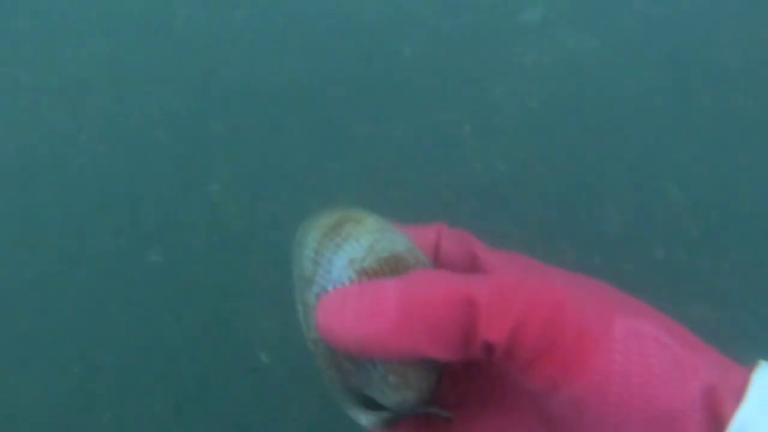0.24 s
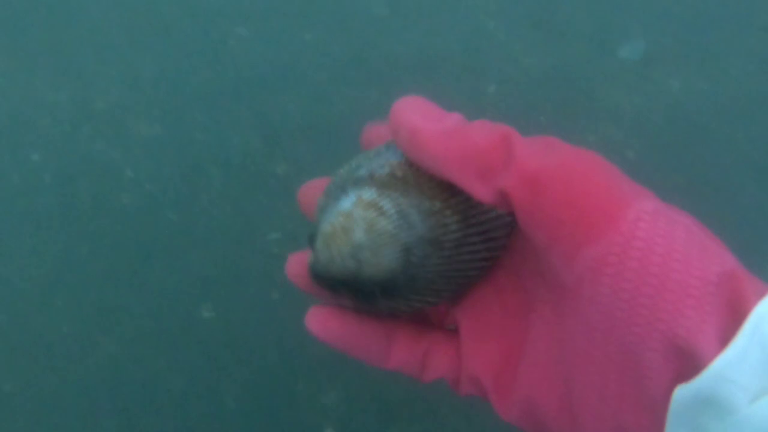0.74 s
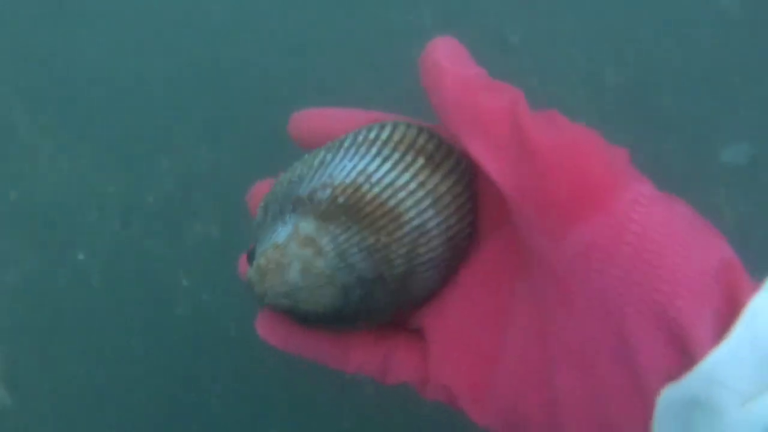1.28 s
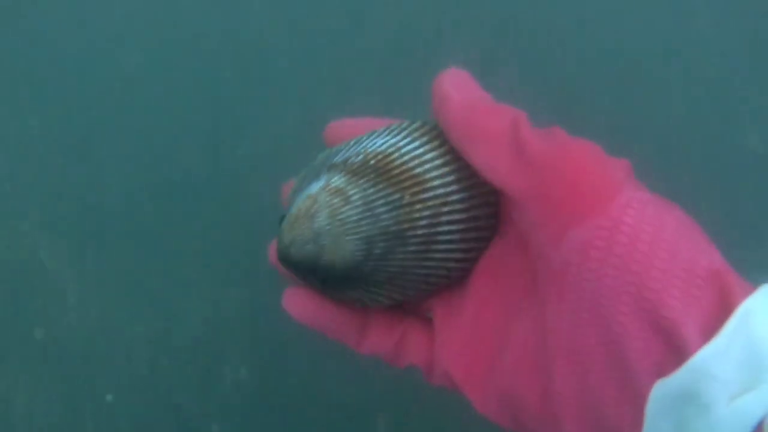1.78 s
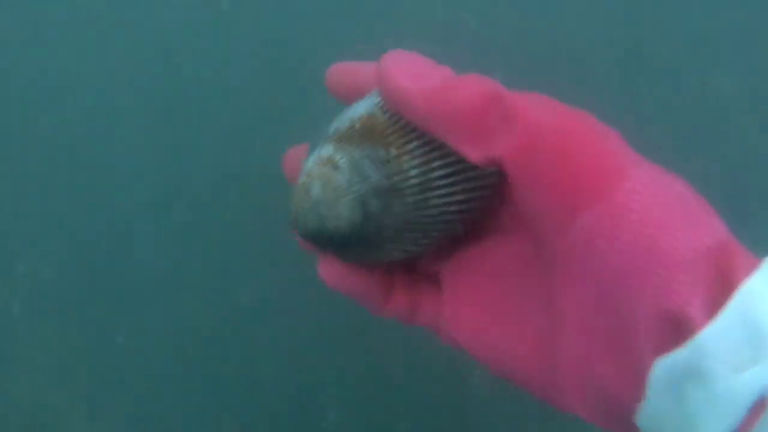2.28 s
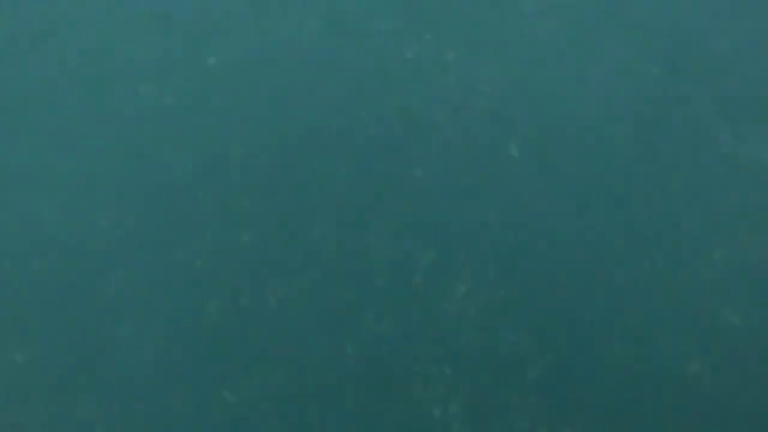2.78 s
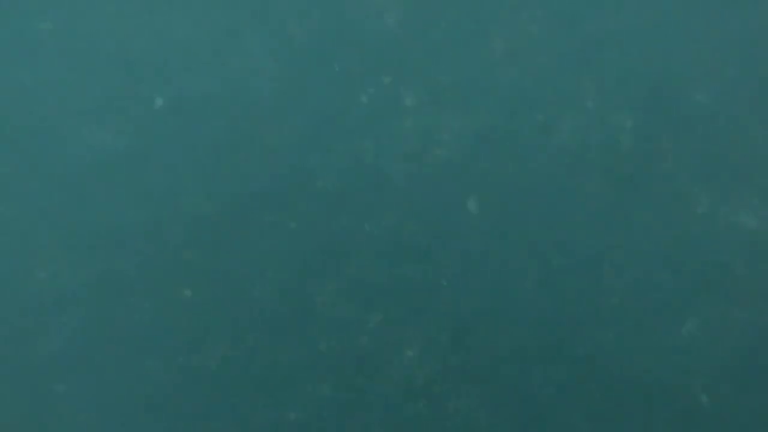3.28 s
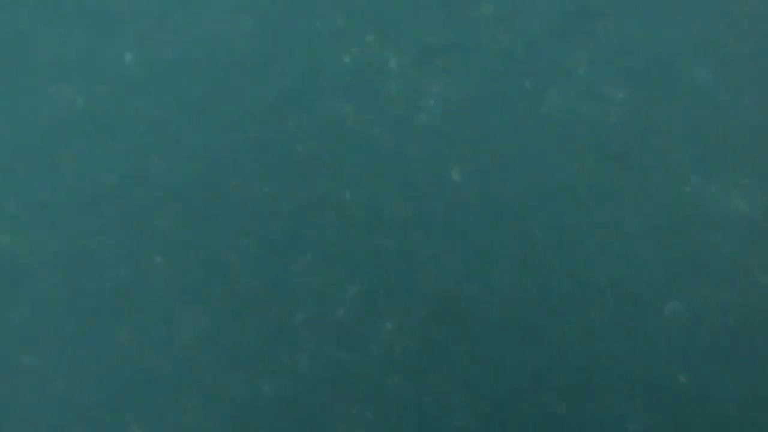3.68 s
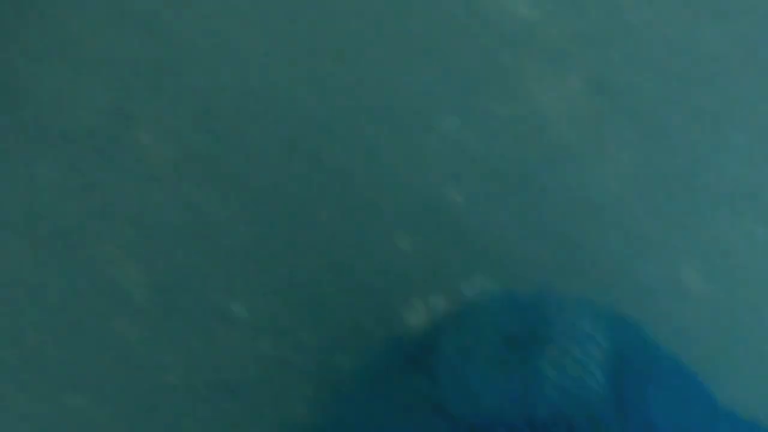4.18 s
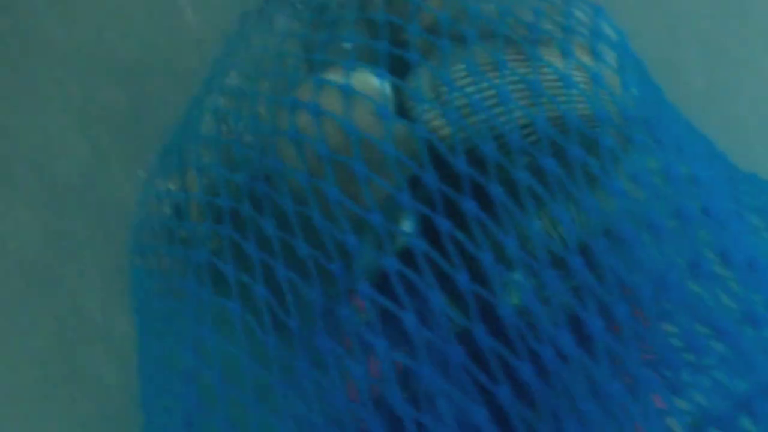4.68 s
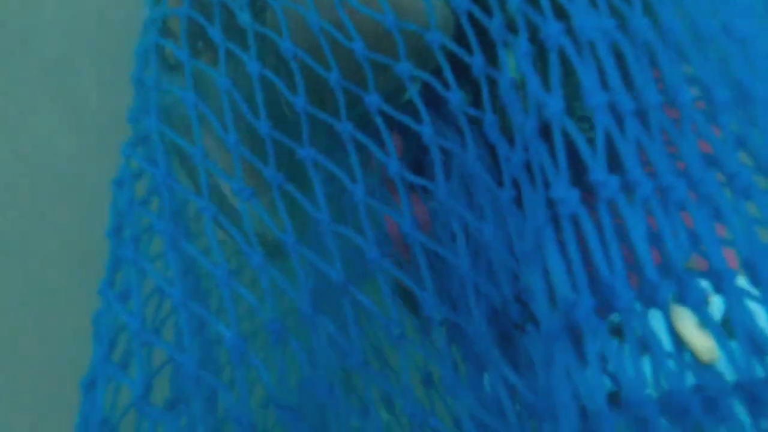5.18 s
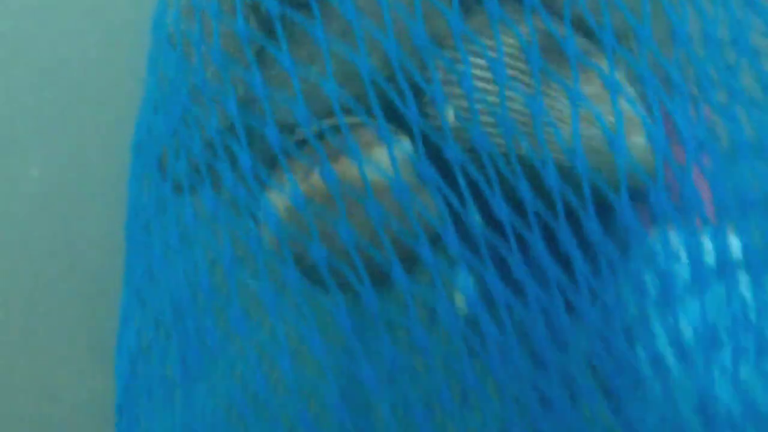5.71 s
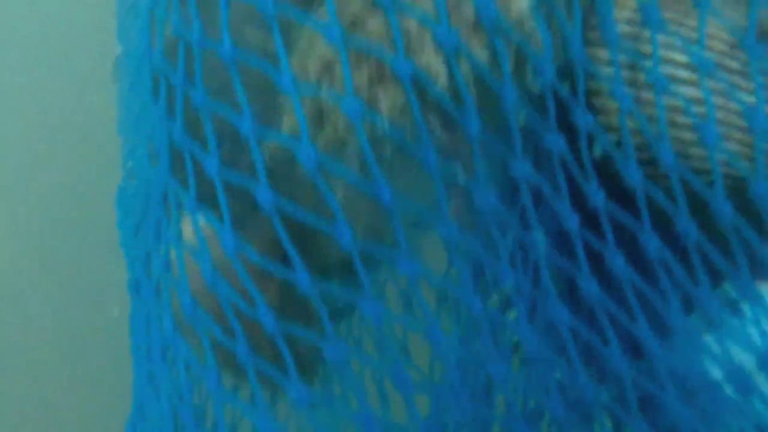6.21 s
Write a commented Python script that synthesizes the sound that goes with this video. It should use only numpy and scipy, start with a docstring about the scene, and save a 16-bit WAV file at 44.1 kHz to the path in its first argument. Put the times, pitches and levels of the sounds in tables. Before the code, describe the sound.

Underwater in the sea, heard through a sealed case: wavering deep rumble, gurgles and dull fizzy hiss run throughout. Small clicks and soft knocks scatter over it. A low boat-engine hum climbs from about one second and drops after two and a half; a jolt and cluster of clicks follow around four seconds, then the engine revs again, higher, to the end.

```python
"""A low drone under water, likely a boat engine, revs up twice and falls away: a near-sine with overtones.
Water rumbles as wavering noise bands and gurgles round a sealed case as noise and rising bubble tones.
Hiss, crackle, clicks and blips ring the modes of the case; knocks are decaying sines, and one slow
pressure swing jolts it. The modes reach two microphones with different strength and phase."""
import sys
import numpy as np
from scipy import signal
from scipy.fft import irfft
from scipy.io import wavfile
from scipy.ndimage import uniform_filter1d

SR = 44100
rng = np.random.default_rng(int(sys.argv[2]) if len(sys.argv) > 2 else 0)


def wrap_up_sound(samples):
    """Save the sound to the file named by the first command line argument, as 16-bit audio."""
    columns = np.atleast_2d(samples).T
    # keep every value between -1 and 1, then stretch to whole-number steps
    tamed = np.clip(columns, -1, 1)
    steps = np.round(tamed * 32767).astype(np.int16)
    wavfile.write(sys.argv[1], SR, steps)


N = 284445

# Water round the case, before channel balance and modes: t/s, rumble level/dB, lift of its upper bands/dB,
# gurgle level/dB, drive of hiss into the case/dB, lift of the hiss treble/dB
WATER_FLOW = [(0.0, -21.5, 2.5, -26.5, -16.5, -0.5), (0.502, -21, 0, -28.5, -18.5, 2),
              (0.99, -19, 3.5, -28.5, -19, 2), (1.561, -22, -0.5, -31, -21, -1.5),
              (1.999, -18.5, -1.5, -27, -21.5, 1), (2.371, -22, -4, -34.5, -24.5, 2.5),
              (2.599, -20, -1, -34, -20.5, -0.5), (2.9, -23, 1.5, -33, -22, 1),
              (3.65, -27, 0.5, -32, -21.5, 3.5), (4.051, -24, -0.5, -31.5, -21.5, 1.5),
              (4.649, -17.5, -1.5, -29.5, -18.5, -2), (4.999, -21, 1, -32, -18.5, -2.5),
              (5.351, -22.5, 3, -30.5, -20.5, -2), (5.799, -21, 0, -33, -18, -1.5),
              (6.45, -25.5, 5, -29.5, -24, -3)]
# Relative spectral density of the rumble: f/Hz, level per hertz/dB
RUMBLE_SPECTRUM = [(22, -5), (35, -0.5), (60, -6.5), (100, 2), (150, -2), (220, -12), (320, -15)]
# Lowest modes of the case, relative levels: f/Hz, width of each of two cascaded stages/Hz,
# left level/dB, right level/dB
LOW_MODES = [(315.3, 51, -4.5, -10.5), (474.7, 51, 8.5, -3.5)]
# Higher modes of the case: f/Hz, width of each of two cascaded stages/Hz, level midway between channels/dB
CASE_MODES = [(624, 61, -1.5), (860, 94, -30), (933, 105, -9), (979, 40, -16.5), (1420, 193, -8),
              (1611, 77, -8), (1974, 327, -12), (2705, 336, -20), (3142, 96, -20.5), (3466, 260, -29.5),
              (4160, 440, -34), (5215, 320, -32.5), (5946, 770, -37), (7050, 300, -41.5),
              (7880, 1700, -44.5), (9240, 2600, -52), (11250, 1900, -55.5), (13000, 1900, -64.5)]
# Coupling of each higher mode to the microphones: left minus right level/dB, phase lead of the right/rad,
# share of the drive power common to both (0 to 1)
MODE_PORTS = [(8, 2.1, .9), (-6, 3, .7), (-9, 1.3, .75), (2, .6, .5), (-5, 1.4, .8), (-5, 1.3, .92),
              (-6, 1.6, .97), (11, 1.8, .85), (5, 1.8, .95), (0, .7, .55), (5, 3, .3), (-5, 1.8, .75),
              (14, -.8, .65), (12, -1, .35), (12, 0, .3), (3, 0, .2), (0, 0, .55), (0, 0, .25)]
# Range of modes with reversed polarity, which deepens the valleys beside them: lowest f/Hz, highest f/Hz
FLIPPED_RANGE = (800, 1100)
# Clicks, before the case dulls them: t/s, ring level/dB, ring f/Hz, crack level/dB
CLICK_EVENTS = [(0.155, 3, 3580, -9), (0.284, -7, 2800, -19), (0.339, -6, 2020, -15),
                (0.391, -3.5, 3120, -25), (0.79, -8, 2700, -7), (0.837, -4.5, 1700, -24),
                (0.973, -12, 1560, -20), (1.145, -19, 876, 3.5), (1.193, -7, 1390, -10),
                (1.408, -2, 2070, -23.5), (1.438, -11.5, 1036, -22), (1.561, -5.5, 1540, -16),
                (1.916, -6, 1580, -19), (1.93, -1, 2810, -13), (1.985, -9.5, 2254, -17),
                (2.01, -11, 1500, -27), (2.014, -12, 2850, -19), (2.6715, 10.5, 6000, 5.5),
                (2.672, 4.5, 2936, -5), (2.6735, -7, 1584, -17), (2.864, -31, 920, -7.5),
                (2.893, -12, 2700, -16), (3.019, -11, 1490, -9), (3.156, -0.5, 3000, 3.5),
                (3.164, -5, 1350, 2.5), (3.487, -10, 2820, -6), (3.891, 2, 1460, 7),
                (3.8925, -2.5, 930, -10), (3.904, 4, 6030, -10), (3.927, 2, 5940, -8),
                (3.9445, -0.5, 2700, 6.5), (3.946, -2, 970, -10), (3.98, 0, 980, 2), (4.019, 2, 3480, 8.5),
                (4.02, -8, 990, -10), (4.033, -15, 1480, -1), (4.063, 2, 6040, 4.5),
                (4.085, -10, 2000, -10), (4.413, -15, 915, -1), (4.588, -13, 1740, 1.5),
                (4.596, -1.5, 980, -22), (4.745, -30, 2800, -8), (4.853, -9.5, 880, -28),
                (4.918, 1, 5600, -1), (4.928, -9, 3900, -5), (4.948, -8, 7000, -4), (4.955, -7, 1330, -9),
                (4.967, -2, 8500, -10), (4.982, -4, 6980, -4.5), (4.991, -7, 6740, -7),
                (5.066, -23.5, 3000, -9.5), (5.1, -13, 3730, -10), (5.229, -6, 2430, -9),
                (5.44, -7, 1505, -14), (5.446, -7, 2711, -19.5), (5.456, -16, 2200, -3),
                (5.508, -4, 2910, -6), (5.528, -13, 3060, -0.5), (5.566, -8.5, 2730, -20),
                (5.811, 6, 6000, 5.5), (5.822, 7, 1475, 3.5), (5.875, -10.5, 942, 3),
                (6.04, 2.5, 1510, -5.5), (6.041, -3, 2570, -9.5), (6.068, -4, 1934, -7),
                (6.153, -7, 1467, -15), (6.303, -6.5, 983, -13), (6.408, -9.5, 1410, -5)]
# Range of ring pitch of the faint random clicks: lowest f/Hz, highest f/Hz
FAINT_RANGE = (1420, 3460)
# Dull knocks, before channel balance: t/s, level/dB, f/Hz
KNOCK_EVENTS = [(0.171, -11, 330), (0.343, -9, 448), (0.551, -11, 440), (0.622, -9.5, 460),
                (0.813, -14, 486), (0.851, -12.5, 483), (0.926, -14, 502), (0.954, -11.5, 481),
                (0.998, -13.5, 488), (2.739, -14.5, 337), (2.803, -14.5, 476), (2.861, -11, 278),
                (2.87, -3, 464), (2.871, -15, 267), (3.0, -12.5, 330), (3.367, -14, 466), (3.178, -10, 380),
                (3.249, -7.5, 425), (3.507, -13.5, 480), (4.035, -18, 463), (4.489, -10.5, 244),
                (4.853, -13, 474), (4.974, -11.5, 456), (5.714, -12, 480)]
# Single bubbles near the case, before its modes: t/s, level/dB, f/Hz, decay constant/s
BLIP_EVENTS = [(0.293, -4.5, 1440, 0.0072), (0.336, -1.5, 1460, 0.0032), (0.458, -6.5, 2110, 0.0037),
               (1.314, -13, 877, 0.0077), (1.362, -13, 1440, .005), (1.592, -3, 4400, 0.0022),
               (2.04, -14.5, 900, 0.0064), (3.309, -7, 2661, 0.0042), (3.363, -12, 2780, 0.0059),
               (5.172, 1, 4500, 0.0018), (5.258, -17, 920, 0.013), (5.787, -3.5, 1390, .004),
               (5.904, 0, 1476, 0.0039)]
# One track per rev, before flutter, wobble and channel balance: t/s, firing rate f/Hz, fundamental level/dB
ENGINE_REVS = [
    [(1.2, 56.8, -26), (1.44, 78.6, -20.5), (1.55, 99.14, -22), (1.69, 106.6, -23.5), (1.74, 112.8, -23.5),
     (1.83, 119.3, -22.5), (2.11, 122.6, -17), (2.25, 118.1, -18.5), (2.36, 133.4, -14), (2.42, 123, -16),
     (2.5, 97.1, -17.5), (2.66, 85.65, -31.5)],
    [(4.8, 55.46, -23), (5.05, 72.35, -21.5), (5.28, 92.25, -17), (5.43, 101.7, -22.5), (5.5, 105.5, -20),
     (5.57, 118.8, -16), (5.7, 149.6, -15.5), (5.86, 138.5, -16), (5.92, 124.2, -16), (6.04, 123, -16),
     (6.19, 127.3, -15.5), (6.3, 127.9, -14.5), (6.4, 116.3, -22), (6.45, 105, -20)],
]
# One row per rev: second harmonic at cruising rate with open throttle, level/dB,
# fall to each further harmonic/dB, t at which the throttle starts to close/s
ENGINE_THROTTLE = [(-27, 8, 2.3), (-22.5, 12.5, 5.6)]
# Jolt of the case, before channel balance: t/s, envelope peak level/dB, f/Hz, time from onset to peak/s
SURGE_EVENTS = [(4.025, -9.5, 21.5, 0.028)]


def undb(db):
    """Level law: twenty decibels are a factor of ten in amplitude."""
    return 10 ** (np.asarray(db) / 20)


def unit(x):
    """Normalisation: division by the root mean square makes it 1."""
    return x / np.sqrt(np.mean(x ** 2))


def band(x, hz, width):
    """Simple resonance: a two-pole band-pass has gain 1 at its centre."""
    return signal.lfilter(*signal.iirpeak(hz, hz / width, fs=SR), x)


def walk(rate):
    """Smoothed random process: levels held 1 / rate s and slewed twice, with a spread near 0.7."""
    k = int(SR / rate)
    held = np.repeat(rng.standard_normal(N // k + 1), k)
    return uniform_filter1d(uniform_filter1d(held, k), k)[:N]


def add(out, s, piece):
    """Superposition: a sound starting at s seconds adds to what is already there."""
    i = int(s * SR)
    out[i:i + len(piece)] += piece[:N - i]


def colour(x, modes):
    """Modal superposition: parallel steep resonances (f/Hz, stage width/Hz, complex gain at the centre)."""
    size, early = 8192, 256  # samples; early leaves room for response ahead of time zero
    f = np.arange(size // 2 + 1) * SR / size
    response = sum(g / (1 + 2j * (f - hz) / w) ** 2 for hz, w, g in modes)
    impulse = np.roll(irfft(response, size), early)
    return signal.oaconvolve(x, impulse)[early:early + N]


def rumble(bright_db, flicker_db=3.0, knee_hz=100):
    """Turbulent noise: half-octave-spaced bands waver independently; a lift enters above the knee."""
    table_hz, table_db = np.transpose(RUMBLE_SPECTRUM)
    total = 0
    for f in 22 * 2 ** np.arange(0, 4.1, .5):
        level_db = np.interp(np.log(f), np.log(table_hz), table_db) + flicker_db * walk(9.7)
        level_db = level_db + bright_db * np.clip(np.log2(f / knee_hz), 0, 1)
        noise = band(band(rng.standard_normal(N), f, f / 2), f, f / 2)
        total = total + undb(level_db) * noise
    return unit(total)


def bubbles(count, low_hz, high_hz, cycles, spread_db, glide, tilt_db):
    """Bubble resonance: decaying tones rise slightly; most are small, and high ones are briefer."""
    out = np.zeros(N)
    for when, pitch, long, size in rng.random((count, 4)):
        hz = low_hz * (high_hz / low_hz) ** pitch
        turns = np.arange(int(4 * cycles * SR / hz)) * hz / SR
        shape = np.exp(-turns / (cycles * (0.28 + 1.1 * long))) * (1 - np.exp(-turns))
        gain = undb(spread_db * size ** 2 + tilt_db * pitch)  # tilt favours high bubbles
        add(out, when * N / SR, gain * shape * np.sin(2 * np.pi * turns * (1 + glide * turns / cycles)))
    return unit(out)


def gurgle(level_db):
    """Forced vibration: flow noise and large bubbles excite the lowest modes of the case."""
    flow = unit(band(rng.standard_normal(N), 410.0, 380.0))
    pops = undb(-2.5) * bubbles(count=500, low_hz=198.3, high_hz=540.5, cycles=1.28,
                                spread_db=10.5, glide=0.028, tilt_db=0.0)
    damping = 2.3  # the bubbles cling to the case and widen its modes by this factor
    channels = []
    for ch in range(2):
        free = [(hz, w, undb(level[ch])) for hz, w, *level in LOW_MODES]
        damped = [(hz, damping * w, g) for hz, w, g in free]
        channels.append(colour(flow, free) + colour(pops, damped))
    return unit(np.array(channels)) * undb(level_db)


def grains(per_s, spread_db, tail_s, cap=4):
    """Shot noise: random impulses of very unequal size gate noise with exponential tails."""
    sizes = undb(spread_db * np.minimum(rng.exponential(size=N), cap))
    starts = (rng.random(N) < per_s / SR) * sizes
    envelope = signal.lfilter([1], [1, -np.exp(-1 / (tail_s * SR))], starts)
    return unit(envelope * rng.standard_normal(N))


def hissing_water(hiss_db, treble_db, treble_hz=2350):
    """Broadband excitation: noise, small bubbles and crackle add, then the treble is lifted or lowered."""
    fizz = bubbles(count=1300, low_hz=589.0, high_hz=8330.0, cycles=6.3, spread_db=6.0, glide=.02, tilt_db=11.5)
    hiss = rng.standard_normal(N) * undb(2.9 * walk(13))
    coarse = grains(80., 3.2, 0.009)
    crackle = grains(550.0, 4.5, 0.0011) * undb(3. * walk(6))
    mix = hiss + undb(-5.0) * fizz + undb(-5.5) * coarse + undb(-9.5) * crackle
    wet = undb(hiss_db) * mix
    low = signal.sosfiltfilt(signal.butter(3, treble_hz, fs=SR, output="sos"), wet)
    return low + undb(treble_db) * (wet - low)


def case(hiss_db, treble_db, touched=2.41):
    """Modal coupling: partly shared drive rings modes that reach each microphone with its own gain and phase."""
    common = hissing_water(hiss_db, treble_db)
    hits = clicks() + blips()
    low_flip, high_flip = FLIPPED_RANGE
    channels = []
    for ch in range(2):
        shared, separate, damped = [], [], []
        for (hz, w, db), (pan_db, lead, share) in zip(CASE_MODES, MODE_PORTS):
            polarity = -1 if low_flip < hz < high_flip else 1
            gain = undb(db + pan_db * (.5 - ch)) * np.exp(1j * ch * lead) * polarity
            shared.append((hz, w, gain * np.sqrt(share)))
            separate.append((hz, w, gain * np.sqrt(1 - share)))
            damped.append((hz, touched * w, gain))  # whatever touches the case also damps it
        own = hissing_water(hiss_db, treble_db)
        channels.append(colour(common, shared) + colour(own, separate) + colour(hits, damped))
    return np.array(channels)


def clicks(count=18, spread_db=4.0):
    """Impact excitation: each contact gives a short ring, a higher snap and a crack of noise with a tail."""
    out, t = np.zeros(N), np.arange(SR // 25) / SR
    decay_s, rise_s = 0.0014, 0.00026
    faint_db, faint_crack_db = -13.5, -26  # mean levels of the faint clicks
    low, high = FAINT_RANGE
    faint = []
    for when, size, pitch, sharp in rng.random((count, 4)):
        ring_db = faint_db + spread_db * (size - .5)
        crack_db = faint_crack_db + 2 * spread_db * (sharp - .5)
        faint.append((when * N / SR, ring_db, low * (high / low) ** pitch, crack_db))
    noise = rng.standard_normal((len(CLICK_EVENTS) + count, len(t)))
    noise = band(band(noise, 3400.0, 11000.0), 3400.0, 11000.0)
    tail = (np.exp(-t / 0.0013) + undb(-20.0) * np.exp(-t / 0.028)) * (1 - np.exp(-t / 0.00037))
    for (s, db, hz, crack_db), crack in zip(list(CLICK_EVENTS) + faint, noise):
        ring = np.sin(2 * np.pi * hz * t) * np.exp(-t / decay_s)
        snap = undb(-9.5) * np.sin(3.4 * np.pi * hz * t) * np.exp(-t / 0.00086)
        struck = undb(db) * (ring + snap) * (1 - np.exp(-t / rise_s))
        add(out, s, struck + undb(crack_db) * crack * tail)
    return out


def knocks():
    """Damped oscillation: each dull knock is a decaying sine with a lower thud under it."""
    out, t = np.zeros(N), np.arange(SR // 10) / SR
    envelope = np.exp(-t / 0.0063) * (1 - np.exp(-t / 0.0013)) ** 2
    for s, db, hz in KNOCK_EVENTS:
        thud = undb(-3.0) * np.sin(.9 * np.pi * hz * t)
        add(out, s, undb(db) * (np.sin(2 * np.pi * hz * t) + thud) * envelope)
    return out * undb([[2.2], [-2.8]])  # left, right


def blips():
    """Free bubble oscillation: a soft-onset pure sine decays exponentially."""
    out, t = np.zeros(N), np.arange(SR // 25) / SR
    rise = (1 - np.exp(-t / 0.00095)) ** 2
    for s, db, hz, decay in BLIP_EVENTS:
        add(out, s, undb(db) * np.sin(2 * np.pi * hz * t) * np.exp(-t / decay) * rise)
    return out


def engine(fade_s=0.069):
    """Harmonic series: a near-sine at the firing rate carries overtones that weaken as the throttle closes."""
    t, out = np.arange(N) / SR, 0
    wobble, flutter_db, patchy_db = .003, 1., .5  # scales of random rate, level and overtone drift
    cruise_hz, louder_db_per_octave = 120, 7.5  # the overtones grow with speed
    coast_db, close_s = -13.5, 0.05  # drop of the overtones and time to close the throttle
    for rev, (pull_db, fall_db, closes) in zip(ENGINE_REVS, ENGINE_THROTTLE):
        s, hz, db = np.transpose(rev)
        rate = np.interp(t, s, hz)
        phase = 2 * np.pi * np.cumsum(rate * (1 + wobble * walk(30))) / SR
        closed = np.clip((t - closes) / close_s, 0, 1)
        octaves = np.log2(rate / cruise_hz)
        tone = undb(np.interp(t, s, db) + flutter_db * walk(22)) * np.sin(phase)
        second_db = pull_db + closed * coast_db + louder_db_per_octave * octaves
        for k in range(2, 5):
            overtone_db = second_db - fall_db * (k - 2) + patchy_db * (k - 2) * walk(12)
            tone += undb(overtone_db) * np.cos(k * phase)
        fade_in = np.clip((t - s[0]) / fade_s, 0, 1)
        fade_out = np.clip((s[-1] + fade_s - t) / fade_s, 0, 1)
        out = out + np.sqrt(2) * tone * fade_in * fade_out  # root two: levels are of the RMS
    return out


def surge():
    """Transient pressure: a slow swing builds and dies within about four cycles."""
    out, t = np.zeros(N), np.arange(SR // 3) / SR
    for s, db, hz, decay in SURGE_EVENTS:
        envelope = t / decay * np.exp(1 - t / decay)
        add(out, s, -undb(db) * np.sin(2 * np.pi * hz * t) * envelope)
    return out


def scene():
    """Superposition: bass, gurgle, knocks and case modes add at the two microphones."""
    s, *columns = np.transpose(WATER_FLOW)
    t = np.arange(N) / SR
    rumble_db, bright_db, gurgle_db, hiss_db, treble_db = (np.interp(t, s, c) for c in columns)
    slosh_db = 3.5 * walk(18)  # the water moves in lumps shared by the upper rumble and the gurgle
    bass = engine() + undb(rumble_db) * rumble(bright_db + slosh_db) + surge()
    left_lag, pan_db = 3, 1.78  # samples; left minus right level/dB
    left = np.pad(bass, (left_lag, 0), mode="edge")[:N] * undb(pan_db / 2)
    right = bass * undb(-pan_db / 2)
    return np.array([left, right]) + gurgle(gurgle_db + slosh_db) + knocks() + case(hiss_db, treble_db)


def record(dry):
    """Band limitation: a steep low-pass filter removes the top above 15200 Hz."""
    return signal.sosfilt(signal.ellip(8, .2, 70, 15200, fs=SR, output="sos"), dry)


dry = scene()
out = record(dry)
wrap_up_sound(out)
```